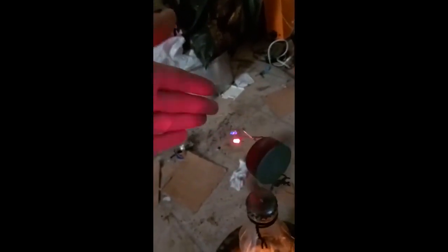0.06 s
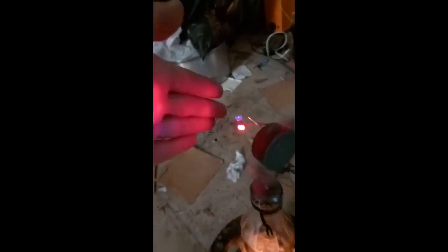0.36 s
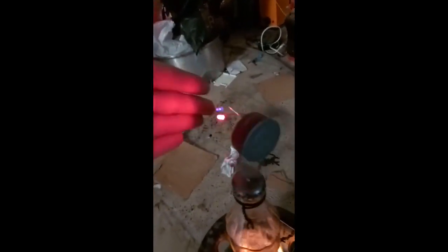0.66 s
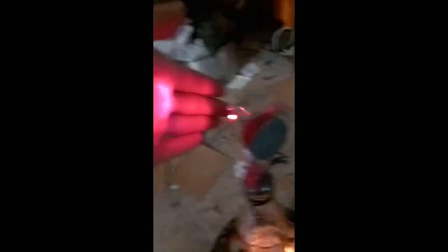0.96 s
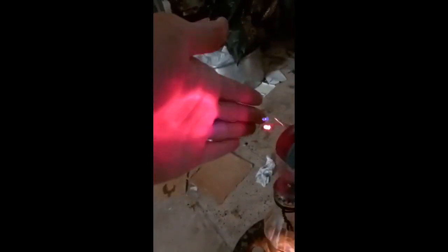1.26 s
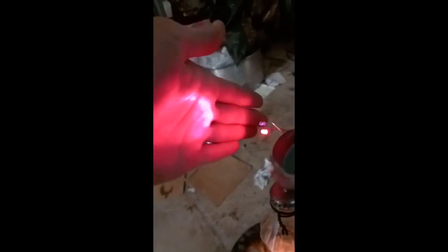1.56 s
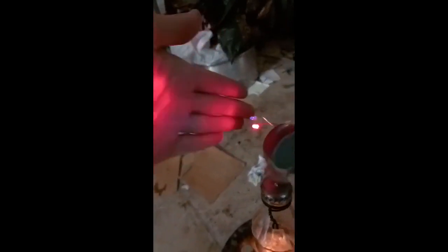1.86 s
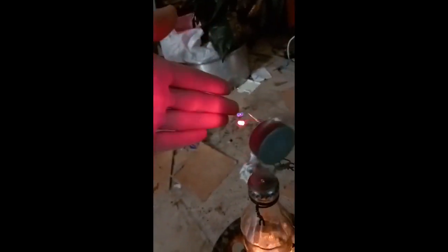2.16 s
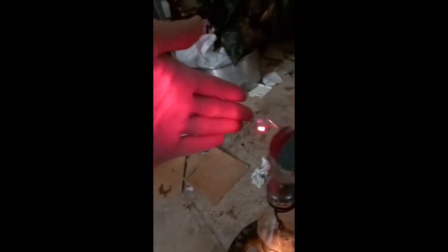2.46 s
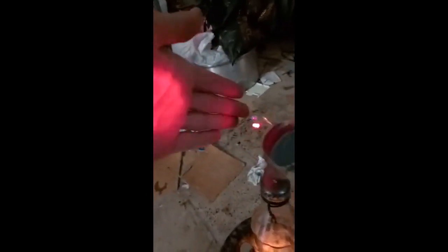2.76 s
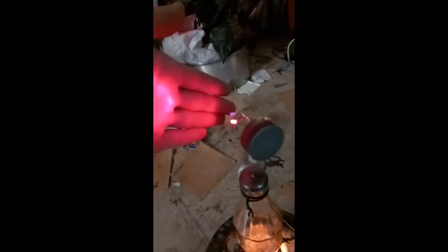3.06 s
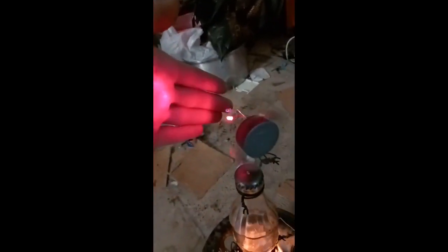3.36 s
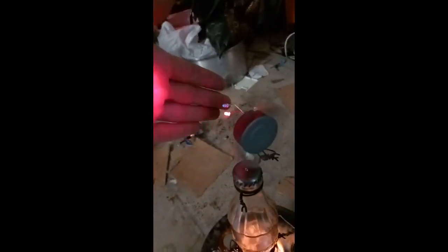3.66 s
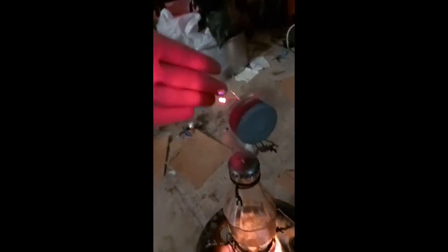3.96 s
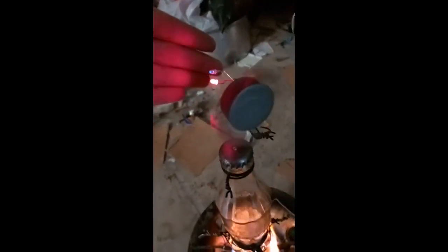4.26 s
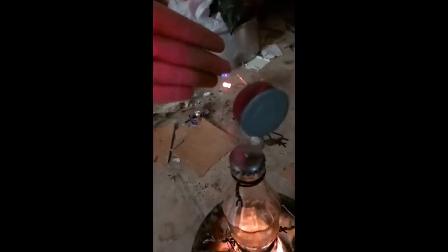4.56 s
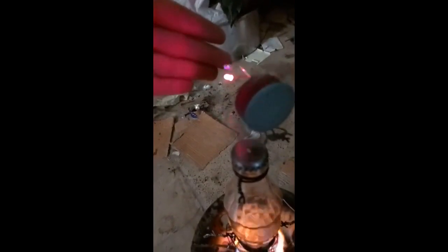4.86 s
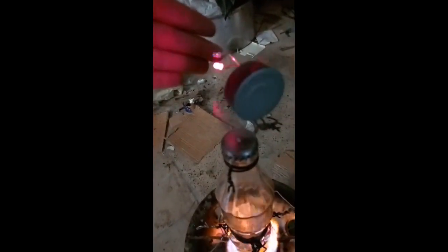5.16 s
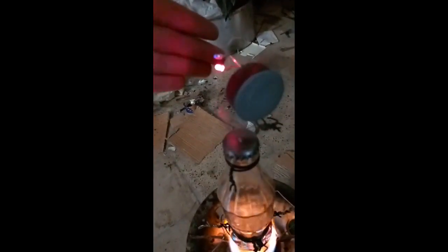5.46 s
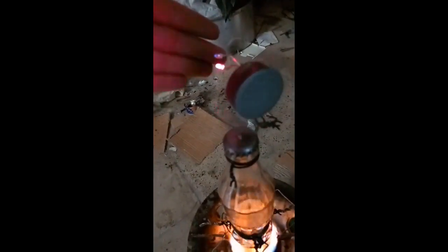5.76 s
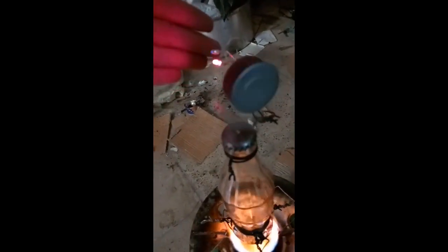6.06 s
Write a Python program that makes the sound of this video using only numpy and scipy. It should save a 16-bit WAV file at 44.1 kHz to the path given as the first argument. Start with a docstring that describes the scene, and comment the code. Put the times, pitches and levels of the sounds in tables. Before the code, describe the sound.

A steam jet hisses steadily, chopped into a rapid rasping flutter by a small bladed wheel, while droplets sizzle and fire rumbles faintly.

```python
"""Steam jet on a small turbine.

In a workshop, steam hisses from a nozzle on a heated bottle onto a homemade eight-bladed wheel. Each blade
chops the jet into a soft thump and a rasp and flings off sizzling droplets; the spray swells with each
spurt of wet steam, now and then with a sharp spit. The fire under the bottle rumbles faintly. Past the
middle the microphone swings towards the nozzle, and rasp and spray grow."""
import sys
import numpy as np
from scipy import signal
from scipy.fft import rfft, irfft, next_fast_len
from scipy.io import wavfile
from scipy.ndimage import map_coordinates

SR = 44100
rng = np.random.default_rng(int(sys.argv[2]) if len(sys.argv) > 2 else 0)


def generate_wav(signal):
    """Clip the signal to [-1, 1] and save it as 16-bit WAV at the path in sys.argv[1]."""
    frames = np.transpose(np.atleast_2d(signal))
    scaled = np.clip(frames, -1, 1) * 32767
    pcm = np.round(scaled).astype(np.int16)
    wavfile.write(sys.argv[1], SR, pcm)


N = 272979
TIME = np.arange(N) / SR


def from_db(db):
    """Decibels to gain."""
    return 10 ** (np.asarray(db) / 20)


def unit_rms(x):
    """Scale to rms 1."""
    return x / np.sqrt(np.mean(x ** 2) + 1e-20)


def curves(rows):
    """Each column after time, interpolated per sample."""
    times, *columns = np.transpose(rows)
    return [np.interp(TIME, times, column) for column in columns]


def butter(x, hz, kind, order=2):
    """Butterworth high- or low-pass."""
    return signal.sosfilt(signal.butter(order, hz, kind, fs=SR, output="sos"), x)


def zero_phase(x, hz, kind, order=2):
    """Butterworth run forwards, then backwards."""
    return butter(butter(x, hz, kind, order)[::-1], hz, kind, order)[::-1]


def delayed(x, lag_ms):
    """Fractional delay, fixed or varying."""
    return map_coordinates(x, [np.arange(N) - lag_ms * SR / 1000], order=3)


def turbulence(spectrum, white=None):
    """Steady coloured noise, rolled off below the spectrum's first point; rms 1."""
    hz, db = np.transpose(spectrum)
    size = next_fast_len(N)
    white = rng.standard_normal(N) if white is None else white
    bins_hz = np.maximum(np.fft.rfftfreq(size, 1 / SR), 1)
    gain = from_db(np.interp(np.log(bins_hz), np.log(hz), db))
    roll_off = np.minimum(bins_hz / hz[0], 1) ** 2
    return unit_rms(irfft(rfft(white, size) * gain * roll_off, size)[:N])


def drift(rate_hz):
    """Random wander within +-2."""
    return np.interp(TIME * rate_hz, np.arange(N), np.clip(rng.standard_normal(N), -2, 2))


def swells(times, heights, rise_s, fall_s):
    """A lopsided Gaussian pulse at each time."""
    impulses = np.zeros(N)
    np.add.at(impulses, np.clip(np.round(times * SR).astype(int), 0, N - 1), heights)
    lag_s = np.arange(-SR // 100, SR // 100 + 1) / SR
    bell = np.exp(-.5 * (lag_s / np.where(lag_s < 0, rise_s, fall_s)) ** 2)
    return signal.fftconvolve(impulses, bell, "same")


def moving_resonance(x, centre_hz, width_hz, block=256):
    """Two-pole band-pass, retuned each block; rms 1."""
    radius = np.exp(-np.pi * width_hz / SR)
    out, state = np.zeros(N), np.zeros(2)
    for i in range(0, N, block):
        poles = [1, -(1 + radius ** 2) * np.cos(2 * np.pi * centre_hz[i] / SR), radius ** 2]
        out[i:i + block], state = signal.lfilter([1, 0, -1], poles, x[i:i + block], zi=state)
    return unit_rms(out)


# Microphone swing towards the nozzle: (time [s], position [0-1])
SWING = [(0, 0.3), (3.2, 0.32), (4.0, 0.53), (4.7, 0.81), (5.4, 1), (6.19, 0.82)]

def with_swing(away, facing):
    """A setting that follows the swing: `away` at position 0, `facing` at 1."""
    return away + (facing - away) * curves(SWING)[0]


def round_the_case(x):
    """Treble reaches the microphone's shaded port late and inverted."""
    return -delayed(x, lag_ms=with_swing(.342, .47))


def at_ports(x, far_db):
    """A bright source at the near (left) and the far, shaded (right) port."""
    return np.array([x, from_db(far_db) * round_the_case(x)])


def flutter(x, depth_db, rate_hz=45):
    """Eddies of different sizes make three bands waver independently."""
    low, below_top = (zero_phase(x, hz, "low", order=4) for hz in (5600, 11200))
    bands = low, below_top - low, x - below_top
    return sum(band * from_db(depth_db * drift(rate_hz)) for band in bands)


# Hollow band of the hiss: (time [s], centre [Hz])
HOLLOW_CENTRE = [(0.06, 8770.0), (0.84, 7400), (1.45, 8360), (2.19, 7400), (2.61, 8500), (3.48, 7340),
                 (3.89, 7600), (4.24, 6150), (4.4, 7200), (4.8, 6950), (6.19, 7100)]

def hollow_band(width_hz=2400):
    """Steep-sided band of jet noise that slides as hand and microphone move."""
    centre_hz, = curves(HOLLOW_CENTRE)
    band = moving_resonance(rng.standard_normal(N), centre_hz, width_hz)
    return from_db(with_swing(-7.5, -5)) * moving_resonance(band, centre_hz, width_hz)


# Jet spectrum at each port: (frequency [Hz], relative density [dB])
JET_NEAR_SPECTRUM = [(1100, -19), (1900, -17), (2800, -10), (4000, -7), (5000, -9), (6350, -11), (7350, -1),
                     (8350, 2.5), (8850, 5.5), (9500, -1.5), (11100, -.5), (12200, -3), (15500, -2.5)]
JET_FAR_SPECTRUM = [(1100, -27), (1700, -15.5), (3200, -4.8), (4500, -3.5), (5700, .3), (6900, .3),
                    (7500, 4), (8150, 1), (8600, -7), (9300, -8.5), (10200, -6), (11500, 1), (13000, 5.2),
                    (14000, 2), (14800, -2), (15700, -3)]
# Jet at the near port: (time [s], level [dB])
JET_NEAR_LEVEL = [(0.01, -27.5), (0.2, -28), (0.59, -25), (0.95, -29), (1.51, -28.5), (2.12, -26.5),
                  (2.26, -27), (2.84, -28), (3.22, -25.0), (3.64, -28), (3.84, -25.5), (4.38, -28),
                  (4.47, -25.1), (4.79, -27.5), (6.19, -26)]

def jet(shared=.4, far_level_db=-29):
    """The free jet: fluttering turbulent hiss, partly shared by both ports."""
    direct, diffuse = rng.standard_normal((2, N))
    shaded = shared * round_the_case(direct) + np.sqrt(1 - shared ** 2) * diffuse
    hiss = unit_rms(turbulence(JET_NEAR_SPECTRUM, direct) + hollow_band())
    near = flutter(hiss, depth_db=2)
    far = flutter(turbulence(JET_FAR_SPECTRUM, shaded), depth_db=2.75)
    return np.array([from_db(curves(JET_NEAR_LEVEL)[0]) * near, from_db(far_level_db) * far])


# Fire and room rumble: (frequency [Hz], relative density [dB])
FIRE_SPECTRUM = [(20, -23), (45, -16), (70, -4.5), (105, 4), (150, -2.5), (205, -1), (270, -10.5),
                 (370, -6.5), (520, -6.5), (750, -14.5), (1200, -20.5), (2500, -25.5)]

def fire(level_db=-45.5, side_db=-5, far_db=-2):
    """Low rumble of the flame, much alike at both ports."""
    side = from_db(side_db) * turbulence(FIRE_SPECTRUM)
    mid = turbulence(FIRE_SPECTRUM)
    return from_db(level_db) * np.array([mid + side, from_db(far_db) * (mid - side)])


# Rotor: (time [s], speed [rev/s])
ROTOR_SPEED = [(0.0, 12.398), (0.36, 12.448), (0.73, 12.387), (1.09, 12.386), (1.46, 12.42), (1.82, 12.309),
               (2.18, 12.309), (2.55, 12.232), (2.91, 12.155), (3.28, 12.426), (3.64, 12.233),
               (4.01, 12.249), (4.37, 12.248), (4.73, 12.164), (5.1, 12.008), (5.46, 12.088), (5.83, 11.99),
               (6.19, 11.864)]
# Hand-bent blades: (lateness [blade gaps], strength [dB])
BLADE_ERRORS = [(.14, -1), (.17, 0), (.02, -1.5), (.02, 0), (-.1, -.5), (0, -.5), (-.03, .5), (.02, -1.5)]

def blade_passes(start_gaps=.49):
    """Times [s] and strengths [dB] of the uneven blades crossing the jet."""
    late_gaps, strength_db = np.transpose(BLADE_ERRORS)
    travel_gaps = start_gaps + np.cumsum(curves(ROTOR_SPEED)[0]) * len(BLADE_ERRORS) / SR
    count = np.arange(1, int(travel_gaps[-1]) + 1)
    blade = count % len(BLADE_ERRORS)
    return np.interp(count + late_gaps[blade], travel_gaps, TIME), strength_db[blade]


def chopping(passes, width_s, scatter_db, jitter_s, early_s=0, fall_s=None):
    """One pulse per blade pass, uneven in height and timing; rms 1."""
    times, strength_db = passes
    scatter, jitter = rng.standard_normal((N // 100, 2))[:len(times)].T
    heights = from_db(strength_db + scatter_db * np.clip(scatter, -2, 2))
    return unit_rms(swells(times - early_s + jitter_s * jitter, heights, width_s, fall_s or width_s))


# How squarely the jet meets the blades: (time [s], level [dB])
THUMP_LEVEL = [(0, -42), (1.03, -41), (1.22, -46), (1.45, -44.5), (2.4, -43), (3.4, -45.5), (4.15, -41),
               (5.1, -40.5), (6.19, -42.5)]
# Wheel and bottle modes: (frequency [Hz], bandwidth [Hz], relative gain [dB])
BODY_MODES = [(228, 80, 0), (275, 20, -6), (375, 105, -6), (478, 49, -6), (615, 45, 6.5), (920, 112, 16.5)]
# Puff behind each blade: (frequency [Hz], relative density [dB])
PUFF_SPECTRUM = [(120, -37), (200, -5), (300, -6), (480, -20), (620, -17), (800, -8), (1300, -6)]

def thumps(passes, ring_db=-7, puff_db=-40.5, far_db=-7):
    """Pressure builds ahead of each blade and snaps, ringing the body and leaving a dull puff."""
    push = chopping(passes, width_s=.002, scatter_db=1.7, jitter_s=.0003, early_s=.0007)
    snap = chopping(passes, width_s=.00042, scatter_db=2, jitter_s=.00005)
    hum = unit_rms(butter(push + .2 * snap, 77, "high", order=5))
    ring = sum(from_db(db) * signal.lfilter(*signal.iirpeak(hz, hz / width_hz, fs=SR), snap)
               for hz, width_hz, db in BODY_MODES)
    puff = turbulence(PUFF_SPECTRUM) * chopping(passes, width_s=.0025, scatter_db=-3, jitter_s=.00018)
    thump = hum + from_db(ring_db) * unit_rms(ring)
    near = from_db(curves(THUMP_LEVEL)[0]) * thump + from_db(puff_db) * puff
    return np.array([near, from_db(far_db) * delayed(near, lag_ms=.33)])


# Chopped steam: (frequency [Hz], relative density [dB])
RASP_SPECTRUM = [(700, -39), (1200, -5.5), (1800, -1.5), (2400, 7.5), (3100, 4.5), (4400, 5.5), (5800, 9.5),
                 (7500, -19), (10000, -20)]
# Pocket between nozzle and blade: (time [s], resonance [Hz], level [dB])
POCKET_NOTE = [(0.01, 3220.0, -65), (0.56, 3900, -43), (0.7, 3600.0, -43), (1.03, 3190.0, -41),
               (1.16, 4440, -43), (1.34, 4540, -40.5), (1.8, 4240, -43.5), (2.4, 4050, -42.5),
               (3.6, 3880, -46), (4.3, 3100, -43), (6.19, 3120, -52)]

def rasp(passes):
    """Steam tears harder as a blade nears and stops as it passes; the pocket sounds a hollow note."""
    tear = chopping(passes, width_s=.0034, scatter_db=2, jitter_s=.00024, early_s=.00064, fall_s=.00051)
    edge = from_db(with_swing(-40, -33)) * tear * turbulence(RASP_SPECTRUM)
    note_hz, note_db = curves(POCKET_NOTE)
    note = moving_resonance(butter(rng.standard_normal(N), 1700, "high"), note_hz, width_hz=430)
    gate = chopping(passes, width_s=.0014, scatter_db=2.5, jitter_s=.00035, early_s=.0006, fall_s=.00029)
    return at_ports(edge + from_db(note_db) * gate * note, far_db=-13)


# Wet steam spurts: (peak time [s], half-power length [s], peak level [dB], sizzle centre [Hz])
WET_SPURTS = [(.17, .11, -29, 12700), (0.575, .13, -27, 12800), (.85, .04, -28, 14000),
              (1.09, .11, -30, 13300), (1.278, 0.17, -27, 13000), (1.63, .09, -27, 13600),
              (2.022, .19, -31, 12600), (2.44, .22, -29, 12400), (2.7, .09, -25.5, 11800),
              (3.054, 0.16, -27, 11500), (3.29, 0.14, -30, 11700), (3.78, 0.13, -30, 13900),
              (4.02, 0.044, -31, 12500), (4.154, 0.086, -28, 10900), (4.52, 0.098, -28, 13300),
              (4.707, .1, -29.5, 14200), (5.16, .11, -33, 12000), (5.336, 0.073, -29, 12800),
              (5.645, 0.16, -26, 13100), (5.89, 0.16, -28, 14200), (6.15, 0.14, -29, 13400)]

def wetness():
    """Gain and centre [Hz] of the sizzle: steady spray plus spurts, weighted by power."""
    power = from_db(with_swing(-35.5, -28.5)) ** 2
    weighted_hz = power * with_swing(13000, 13400)
    for peak_s, length_s, peak_db, centre_hz in WET_SPURTS:
        spurt = from_db(peak_db) ** 2 * .5 ** ((2 * (TIME - peak_s) / length_s) ** 2)
        power += spurt
        weighted_hz += spurt * centre_hz
    return np.sqrt(power), weighted_hz / power


def spray(passes, flicker_db=.9):
    """Droplets shatter on each blade: a sharp crack inside a wider puff of mist."""
    gain, centre_hz = wetness()
    crack = chopping(passes, width_s=.00035, scatter_db=1.5, jitter_s=.00015)
    mist = chopping(passes, width_s=.0019, scatter_db=.7, jitter_s=.00024)
    treble = butter(rng.standard_normal(N), 5700, "high", order=4)
    sizzle = moving_resonance(treble, centre_hz, width_hz=3200)
    flicker = from_db(flicker_db * drift(rate_hz=24))
    return at_ports(gain * flicker * unit_rms(.49 * crack + mist) * sizzle, far_db=-41)


def sputter(passes, ring_s=.00085, size_db=3, spread_octaves=.25, early_s=.000991):
    """Each blade pops a droplet near the pocket's pitch; most are tiny, a few stand out."""
    times = passes[0] - early_s
    sizes = np.minimum(rng.exponential(1, N // 100), 4)
    detune = np.clip(rng.standard_normal(N // 100)[:len(times)], -2, 2)
    pocket_hz = np.interp(times, TIME, curves(POCKET_NOTE)[0])
    pops_hz = pocket_hz * 2 ** (spread_octaves * detune)
    t = TIME[:SR // 50]
    envelope = np.sqrt(t) * np.exp(-t / ring_s)
    pops = np.zeros(N + SR)
    for start_s, hz, size in zip(times, pops_hz, sizes):
        i = max(int(start_s * SR), 0)
        pops[i:i + len(t)] += from_db(size_db * size) * np.sin(2 * np.pi * hz * t) * envelope
    return at_ports(from_db(with_swing(-45, -43.5)) * unit_rms(pops[:N]), far_db=-9)


# Large drops: (time [s], relative level [dB])
LARGE_DROPS = [(.5888, -12), (.598, -9.5), (.6088, -11), (1.163, -12), (1.3053, -12), (4.1722, -13),
               (4.1833, -14), (4.2539, -4), (5.2227, -11), (5.3993, -11)]

def spits(gain_db=-6):
    """A large drop hit by a blade bursts in about a millisecond."""
    times, level_db = np.transpose(LARGE_DROPS)
    bursts = swells(times, from_db(level_db + gain_db), rise_s=.0003, fall_s=.0004)
    treble = butter(rng.standard_normal(N), 10500, "high", order=4)
    sizzle = unit_rms(butter(treble, 15000, "low", order=4))
    return at_ports(bursts * sizzle, far_db=-20)


def workshop(x, wet_db=-11, t60_s=.04, predelay_s=.003):
    """Add a short diffuse tail, different at each port."""
    t = TIME[:SR // 3]
    tail = rng.standard_normal((2, len(t))) * from_db(-60 * t / t60_s) * (t > predelay_s)
    tail /= np.sqrt(np.sum(tail ** 2, axis=1, keepdims=True))
    return x + from_db(wet_db) * signal.fftconvolve(x, tail, axes=1)[:, :N]


# Reflection off the wheel: (time [s], delay [ms], gain [dB])
WHEEL_ECHO = [(0, .185, -10), (.08, .245, -8), (.18, .245, -7), (.26, .205, -9), (.37, .18, -8),
              (.47, .15, -16), (.59, .085, -12), (.73, .094, -11), (.79, .132, -6), (.89, .101, -4),
              (1, .1, -5), (1.12, .08, -9), (1.42, .075, -14), (1.53, .132, -12), (1.64, .09, -13),
              (1.73, .092, -3), (1.86, .107, -4), (2.2, .147, -8), (2.4, .14, -8), (2.67, .116, -11),
              (2.82, .124, -6), (2.94, .106, -4.5), (3.08, .125, -11), (3.37, .1, -9), (3.47, .125, -7),
              (3.7, .126, -9), (4.04, .154, -3), (4.16, .16, -6), (4.28, .21, -6), (4.44, .185, -8),
              (4.57, .221, -7), (4.85, .232, -5.5), (5.05, .235, -8), (5.38, .242, -6), (5.75, .194, -10),
              (6.19, .231, -8)]

def wheel_echo(x, lowest_hz=6800):
    """The small wheel reflects only treble, combing the hiss so it swishes as the microphone moves."""
    delay_ms, echo_db = curves(WHEEL_ECHO)
    return x + from_db(echo_db) * delayed(zero_phase(x, lowest_hz, "high"), delay_ms)


def scene():
    """Jet, turbine and fire in the workshop; stereo."""
    passes = blade_passes()
    steam = jet() + thumps(passes) + rasp(passes) + spray(passes) + spits() + sputter(passes)
    near, far = workshop(steam)
    return np.array([wheel_echo(near), far]) + fire()


def record(dry):
    """Steep elliptic low-pass."""
    cutoff_hz = 15740
    return signal.sosfilt(signal.ellip(12, .1, 90, cutoff_hz, fs=SR, output="sos"), dry)


dry = scene()
out = record(dry)
generate_wav(out)
```